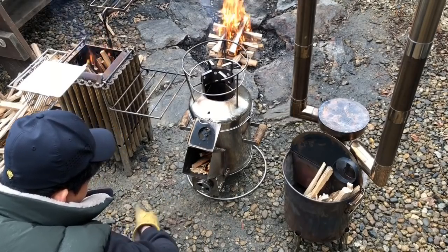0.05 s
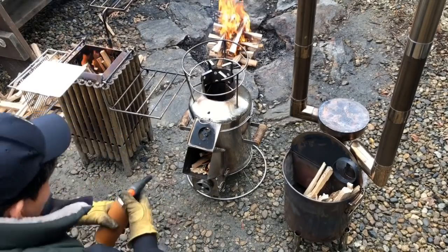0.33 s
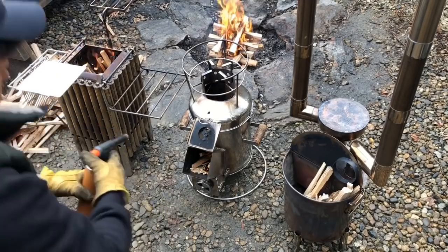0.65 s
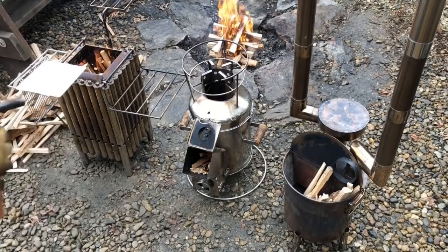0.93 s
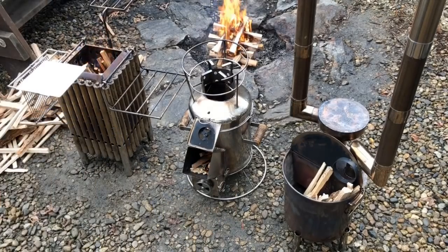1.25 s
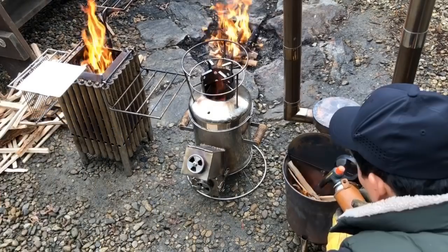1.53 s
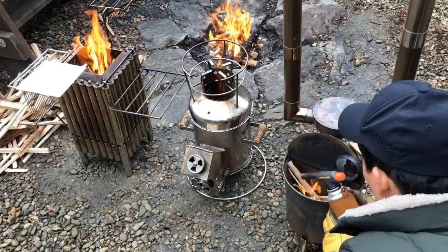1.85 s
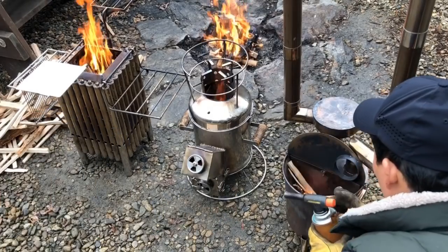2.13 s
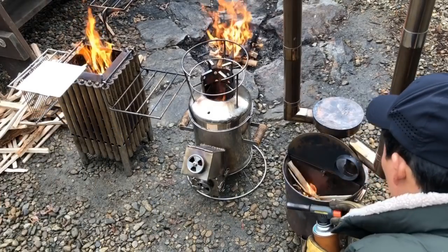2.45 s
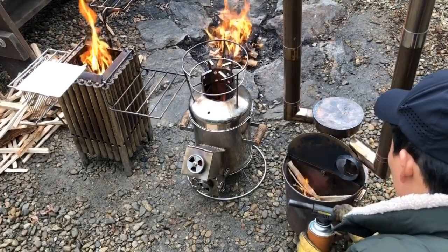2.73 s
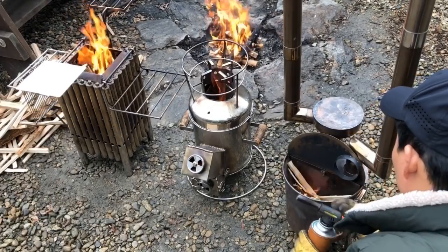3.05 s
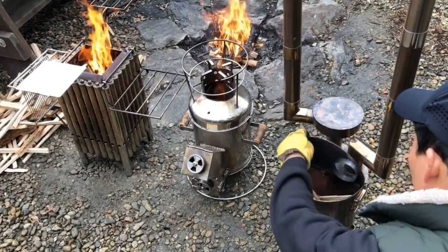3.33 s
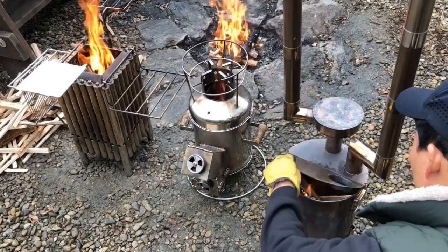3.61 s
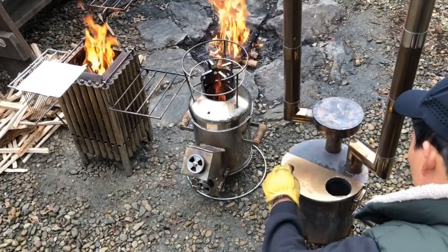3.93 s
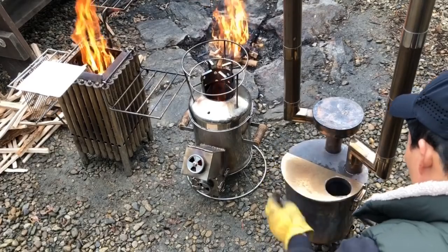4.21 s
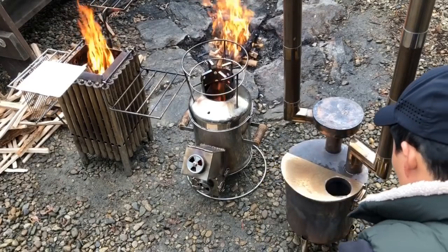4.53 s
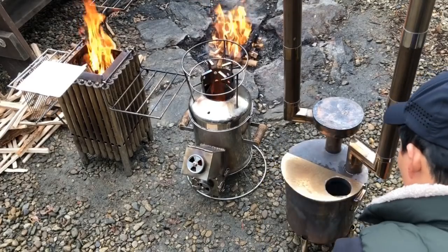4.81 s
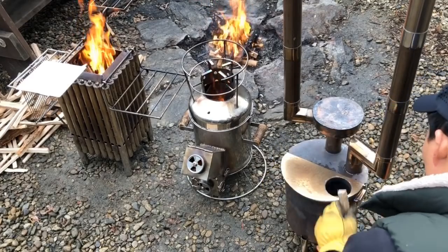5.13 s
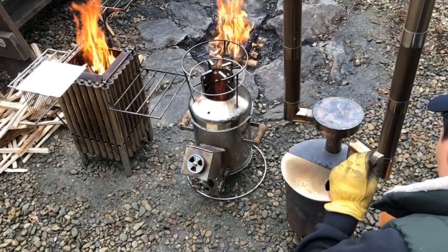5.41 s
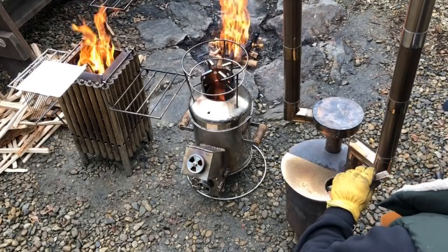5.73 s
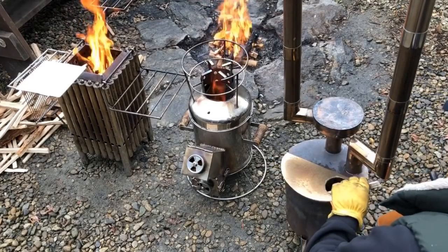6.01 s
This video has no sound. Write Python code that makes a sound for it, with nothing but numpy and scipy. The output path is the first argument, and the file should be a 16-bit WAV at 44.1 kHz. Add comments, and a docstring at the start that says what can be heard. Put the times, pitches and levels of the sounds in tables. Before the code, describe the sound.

Heard from close by in a gravel yard, burning firewood snaps and crackles over a low flutter of flames. A gas torch hisses, catches with a gentle roar and a thin whistle, then stops. After faint peeps from a far bird comes the loudest sound: a steel stove lid catches on its rim and rattles shut, ringing over the drum's thud. Boots occasionally scuff the pebbles, and a glove softly nudges the lid twice.

```python
"""Wood stoves flutter on a gravel yard; firewood pops throughout and boots shift now and then.
At 0.3 s a gas torch starts to hiss. It lights at 1.3 s with a soft, hollow roar, is drawn back from
the drum stove and shut off at 2.7 s. A far bird peeps. From 3.4 s a gloved hand nudges the hinged
steel lid; it catches on the rim, judders shut in a loud clatter and rings out over the drum's thud.
Near 5.9 s the glove nudges it twice more."""
import sys
import numpy as np
from scipy import signal
from scipy.fft import rfft, irfft, next_fast_len
from scipy.io import wavfile
from scipy.ndimage import map_coordinates

SR = 44100
rng = np.random.default_rng(int(sys.argv[2]) if len(sys.argv) > 2 else 0)


def dump_mix(stems):
    """Bounce the given channels to the path in sys.argv[1] as a 16-bit WAV at rate SR."""
    frames = np.atleast_2d(stems).T  # one column per channel
    limited = np.clip(frames, -1, 1)  # hard clip at full scale
    pcm = np.round(limited * 32767).astype(np.int16)
    wavfile.write(sys.argv[1], SR, pcm)


N = 267246

# bed of burning stoves and open air: f/Hz, level/dB
YARD_EQ = [(15, -47), (25, -7.5), (102, -4.5), (200, -8.5), (309, -5), (545, -21), (591, -16.5),
           (677, -20.5), (796, -19.5), (863, -19.5), (2350, -25), (2610, -23.5), (4300, -21.5),
           (6740, -22.5), (11300, -40.5), (16000, -29)]
# far bird: t/s, level/dB
PEEPS = [(2.725, -71), (3.27, -77), (3.454, -73.5), (4.28, -73), (4.435, -73), (4.69, -75)]
# boots grinding gravel: t/s, level/dB, half-width/s, tilt/(dB per octave)
SCUFFS = [(0.184, -65.5, 0.027, -1), (0.948, -51, 0.025, 2), (1.05, -62, 0.06, 4), (1.279, -60, .028, -2),
          (1.895, -48, 0.013, 12.5), (2.963, -57, 0.02, 2), (4.53, -67, .17, -4), (5.002, -62.5, 0.1, -1.5)]
# tone of the pebbles: f/Hz, level/dB
GRAVEL_EQ = [(150, -0.5), (500, -3.5), (1500, -4.5), (3000, -2.5), (6000, 2), (8000, -8), (11000, -14.5),
             (16000, -19)]
# soft handling bumps: t/s, level/dB, f/Hz
BUMPS = [(1.295, -55.5, 300), (2.88, -63, 150), (3.322, -57.5, 324), (4.375, -58, 326), (5.366, -59.5, 300)]
# loud pops of firewood and pebbles: t/s, level/dB, centre f/Hz, knock/dB, treble/dB
POPS = [(0.2445, -46, 1810, -7, -18), (0.3205, -41, 6230, -30, -27), (0.4683, -32, 3530, -44, -17.5),
        (0.6556, -33, 4800, -43, -38), (0.7406, -32.5, 6170, -19, -22), (0.8092, -38, 4600, -24, -25),
        (1.0032, -36.5, 4220, -39, -20), (1.017, -42, 5320, -39, -18), (1.026, -39.5, 6800, -38, -31),
        (1.0879, -40, 5850, -37, -25), (1.8825, -32, 6640, -11.5, -15), (2.0338, -38.5, 3970, -24, -38),
        (2.2144, -46.5, 5300, -23, -21), (2.805, -41.5, 1400, -6.5, -34.5), (2.8628, -45, 6860, -8, -25.5),
        (2.8699, -40.5, 1400, -11, -26.5), (2.9455, -34.5, 6350, -19, -27), (3.289, -44, 2520, -13, -30.5),
        (3.3183, -41.5, 5960, -23, -27), (3.3655, -42.5, 4020, -30, -22.5),
        (4.3511, -40.5, 6060, -10.5, -19.5), (4.3908, -39.5, 2500, -14, -28),
        (4.7631, -35, 6100, -8.5, -22), (5.1612, -35.5, 4190, -31, -24), (5.3656, -42, 5800, -20, -22),
        (5.5592, -41, 4650, -8, -28.5), (5.7872, -33, 6170, -37, -14), (5.816, -38, 6600, -30, -19)]
# low knock under a pop: f/Hz, level/dB
KNOCK_EQ = [(80, -27), (300, -1), (1000, -2), (2500, -13.5), (8000, -35)]

# torch moves: t/s, extra echo path/m, top whistle f/Hz
TORCH_MOVES = [(1.25, .56, 9250), (1.55, 0.62, 9460), (1.7, .69, 9300), (1.87, 0.76, 8730),
               (2.15, .81, 8720), (2.42, 0.81, 9150), (2.68, 0.89, 8860)]
# whistle bands: ratio to the top band, level/dB
WHISTLE_BANDS = [(.475, -5), (.595, 2), (1, 0)]
# bright hiss of the gas jet: f/Hz, level/dB
JET_EQ = [(2500, -17), (3400, -13), (3900, 3), (6300, 0.5), (7600, -4), (8800, -3), (10500, -15.5),
          (14000, -17.5), (16000, -19.5)]
# midrange spray of the gas: f/Hz, level/dB
SPRAY_EQ = [(200, -9.5), (800, -1), (2000, -2), (3500, -4), (7000, -24), (16000, -28.5)]
# flame at the drum mouth: f/Hz, level/dB
HOLLOW_FLAME_EQ = [(70, -18.5), (140, 11.5), (220, 2), (330, -4), (430, -5.5), (560, 0.5), (720, -6.5),
                   (1000, 0.5), (1180, -6), (1400, -21), (4000, -35.5)]
# flame in the open: f/Hz, level/dB
OPEN_FLAME_EQ = [(60, -27.5), (140, -2), (240, 1), (340, 6), (480, -1), (800, -4.5), (1300, -9.5),
                 (1700, -16), (3000, -33), (8000, -41)]
# flare-ups: t/s, boost/dB
FLARES = [(1.69, 7), (1.87, 5)]

# glove knocks and drags on the lid: t/s, level/dB, port ring/dB
NUDGES = [(3.4421, -70.5, -20), (3.5194, -65.5, -24), (3.595, -66, -27), (3.7055, -60, -10),
          (5.8821, -56, -9), (5.954, -62, -16)]
# drum rumble under a nudge: f/Hz, level/dB
RUMBLE_EQ = [(100, -16), (200, -1), (350, 0.5), (520, -1), (610, 0), (760, -4.5), (1050, 0), (1200, -6),
             (1380, -4), (1600, -12.5), (2500, -9.5), (5000, -33.5)]
# edge of the lid's round port: f/Hz, level/dB, t60/s
PORT_MODES = [(3530, -1.5, 0.5), (5310, -6, .2), (5720, -3, .2), (6050, -2.5, 0.22)]
# the falling lid catches the rim: t/s, level/dB, sizzle/dB, thud/dB
CATCHES = [(3.7488, -32.5, -9.5, -11), (3.7768, -32.5, -8, -33), (3.7973, -28.5, -20.5, -7.5)]
# the lid's strongest tones: f/Hz, level/dB, t60/s
LID_MODES = [(1004, -8, 0.24), (1181, -13, 0.52), (1330, -18.5, 0.64), (1342, -1.5, 0.22),
             (1464, -20.5, 0.41), (1514, -15.5, 0.503), (1697, -12, .25), (1802, -5.5, 0.3),
             (2040, -6, .25), (2657, -5.5, .24), (3233, 4, 0.1), (3570, -2.5, .22), (3890, -22, 0.76),
             (3900, -6.5, 0.12), (4376, 3, 0.24), (4550, 2, .2), (4920, -1.5, .18), (4930, -5, .18),
             (5076, -23, 0.8), (5219, -3, .18), (5420, 5.5, 0.16), (5870, -9, .2), (6230, 7.5, .17),
             (6810, 6.5, .18), (7380, 2.5, .15), (7190, 5, .15), (7610, -12.5, .15), (8085, -4.5, .15),
             (8120, 2, .15)]
# drum body: f/Hz, level/dB, t60/s
DRUM_MODES = [(149.7, -9.5, 0.4), (190, -2, .25), (221.7, -4.5, 0.36), (295, -6.5, 0.27), (357, -2.5, 0.13),
              (413, -10, .16), (534, -0.5, 0.13), (603, 9.5, 0.076), (680.68, -7.5, .22), (814, -3.5, .14),
              (880, -1, 0.17), (987, 3, .2)]
# dense wash of the steel sheet: f/Hz, level/dB
SHEET_EQ = [(300, -27), (600, -19.5), (760, -18), (1000, -12), (1380, -7.5), (1600, -14.5), (1850, -11.5),
            (2300, -10.5), (2900, -9.5), (3500, -2), (4600, -1.5), (6400, 0.5), (7600, -10), (10500, -16),
            (15700, -15)]
# decay of that wash: f/Hz, t60/s
SHEET_T60 = [(400, 0.39), (750, 0.15), (1200, 0.31), (2000, .3), (3500, 0.275), (6000, 0.26), (10000, 0.23),
             (16000, .15)]
# top-end sizzle of a hard edge hit: f/Hz, level/dB
SIZZLE_EQ = [(5000, -45.5), (8000, 12.5), (10000, 3), (12000, -7), (13300, 10.5), (14500, 0.5), (15500, 11)]
# crack at its attack: f/Hz, level/dB
CRACK_EQ = [(1000, -3), (6000, -4.5), (15000, -10.5)]

OPEN_S, LIGHT_S, WITHDRAW_S, SHUT_S = 0.29, 1.27, 1.907, 2.664  # torch cues
JET_DB, SPRAY_DB, ROAR_DB, WHISTLE_DB = -68, -71, -62.5, -75
SEAT_S, PUSH_S, SLIP_GAP_S, SLIP_COUNT = 3.8314, 0.12, 0.0211, 10  # the lid is pushed home
SETTLE_DB_PER_S, THUD_FADE_DB_PER_S = 249.5, 65
OPEN_DRUM_HZ, TOP_HZ, SOUND_M_PER_S = 240, 15950, 343


def amp(db):
    """Decibels to gain."""
    return 10 ** (np.asarray(db) / 20)


def unit(x):
    """Scale to rms 1."""
    return x / np.sqrt(np.mean(x ** 2) + 1e-20)


def along(points, hz):
    """Read a breakpoint curve on a log frequency axis."""
    f, v = np.transpose(points)
    return np.interp(np.log(hz + 1), np.log(f + 1), v)


def automation(rows):
    """One value per sample for each column after the time."""
    s, *cols = np.transpose(rows)
    return [np.interp(np.arange(N) / SR, s, c) for c in cols]


def fade_in(t, s, takes_s):
    """A smooth rise from 0 to 1 around time s."""
    return .5 + .5 * np.tanh((t - s) / (2 * takes_s))


def wobble(rate):
    """A smooth random curve, rate knots a second."""
    return map_coordinates(rng.standard_normal(int(N * rate / SR) + 4), [np.arange(N) * rate / SR])


def eq(x, gain_db):
    """Filter x by a gain in dB that depends on frequency."""
    m = next_fast_len(len(x) + 2048)
    return irfft(rfft(x, m) * amp(gain_db(np.fft.rfftfreq(m, 1 / SR))), m)[:len(x)]


def noise(spectrum, size):
    """Noise of rms 1 with the given spectrum."""
    return unit(eq(rng.standard_normal(size), lambda hz: along(spectrum, hz)))


def add(track, s, sound):
    """Mix a sound into the track from time s."""
    part = track[round(s * SR):][:len(sound)]
    part += sound[:len(part)]


def grit(size, rate, spread_db):
    """Random tiny impacts of uneven strength, rate a second."""
    ticks = (rng.random(size) < rate / SR) * np.sign(rng.standard_normal(size))
    return ticks * amp(spread_db * np.clip(rng.standard_normal(size), -2, 2))


def clinks(impacts):
    """Give every tiny impact a very short noise tail."""
    t = np.arange(256) / SR
    power = signal.fftconvolve(impacts ** 2, amp(-60 * t / 0.0087) ** 2)[:len(impacts)]
    return np.sqrt(np.abs(power)) * rng.standard_normal(len(impacts))


def fires():
    """The bed: stoves flutter softly under a sprinkle of tiny crackles."""
    crackle = eq(clinks(grit(N, rate=15, spread_db=10)), lambda hz: along(GRAVEL_EQ, hz))
    return amp(-68 + 0.64 * wobble(9)) * noise(YARD_EQ, N) + amp(-81.5) * unit(crackle)


def bird():
    """Short, pure peeps from far off."""
    t = np.arange(N) / SR
    swell = sum(amp(db) * np.exp(-((t - s) / 0.015) ** 2) for s, db in PEEPS)
    pitch_hz = 2700 + 20 * wobble(20)
    return np.sqrt(2) * swell * np.sin(2 * np.pi * np.cumsum(pitch_hz) / SR)


def gravel():
    """Pebbles grind in short swells under a boot, and a little grit scatters after each loud pop."""
    out, t = np.zeros(N), np.arange(N) / SR
    debris = [(s + .015, db - 30, .012, 3.5) for s, db, *_ in POPS]  # columns as in SCUFFS
    for s, db, width_s, tilt_db in SCUFFS + debris:
        near = np.abs(t - s) < 3 * width_s
        grains = clinks(grit(near.sum(), rate=1300, spread_db=4.5))
        stones = eq(grains, lambda hz: along(GRAVEL_EQ, hz) + tilt_db * np.log2(hz / 4000 + 0.25))
        out[near] += amp(db) * unit(stones) * np.exp(-((t[near] - s) / width_s) ** 2)
    return out


def bumps():
    """A soft contact gives one low, quickly damped note."""
    out, t = np.zeros(N), np.arange(8192) / SR
    envelope = amp(4.5 - 60 * t / 0.072) * (1 - np.exp(-t / 0.0014))
    for s, db, hz in BUMPS:
        add(out, s, amp(db) * envelope * np.sin(2 * np.pi * hz * t))
    return out


def faint_pops():
    """Cues for weak pops at random moments, columns as in POPS."""
    return [(when * N / SR, -50.5 + 3 * size, 3000 + 3500 * pitch, -16, -23)
            for when, size, pitch in rng.random((8, 3))]


def pops():
    """Firewood snaps, with a short rattle and knock and a faint scatter off the stoves around."""
    out, t = np.zeros(N), np.arange(8192) / SR
    attack = 1 / (1 + np.exp(-(t - .001) / .00012))
    for s, db, centre_hz, knock_db, treble_db in POPS + faint_pops():
        peak = [(centre_hz * 0.77, -4), (centre_hz, 1), (centre_hz * 1.25, -4)]
        top = [(max(8000, centre_hz * 0.83), -7), (max(10500, centre_hz * 1.4), treble_db + 4)]
        tone = [(200, -12), (1200, -8), *peak, *top, (16000, treble_db + 12)]
        snap = noise(tone, len(t)) * np.exp(-((t - .0015) / .0006) ** 2)
        t60 = 0.035 * 2 ** (knock_db / 31)  # heavier pieces knock more and rattle longer
        rattle = noise(tone, len(t)) * (amp(-10.5 - 60 * t / t60) + amp(-28.5 - 60 * t / 0.18))
        knock = noise(KNOCK_EQ, len(t)) * amp(knock_db - 11 - 60 * t / 0.11)
        add(out, s, amp(db) * (amp(-4.5) * snap / np.abs(snap).max() + rattle + knock) * attack)
    return out


def valve():
    """Envelopes of gas flow and flame, each 0-1."""
    t = np.arange(N) / SR
    flow = fade_in(t, OPEN_S, 0.039) * (1 - fade_in(t, SHUT_S, 0.032))
    return flow, flow * fade_in(t, LIGHT_S, 0.007)


def whistle():
    """Narrow bands of hiss drift together as the lit torch turns in the stove."""
    _, top_hz = automation(TORCH_MOVES)
    _, lit = valve()
    phase = 2 * np.pi * np.cumsum(top_hz) / SR
    bands = np.zeros(N)
    for ratio, db in WHISTLE_BANDS:
        rate = 700 * ratio  # sets the bandwidth
        bands += amp(db) * (wobble(rate) * np.sin(ratio * phase) + wobble(rate) * np.cos(ratio * phase))
    return amp(WHISTLE_DB) * lit * unit(bands)


def comb(x, spacing_hz, strength):
    """Two bounces between drum and ground carve a comb of moving resonances."""
    n = np.arange(N)
    return unit(sum(strength ** k * np.interp(n - k * SR / spacing_hz, n, x) for k in range(3)))


def torch():
    """The gas jet hisses; the flame roars, hollow at first, and its echo lengthens as the torch moves."""
    t = np.arange(N) / SR
    flow, lit = valve()
    age_s = np.maximum(t - LIGHT_S, 0)
    path_m, _ = automation(TORCH_MOVES)
    comb_hz = SOUND_M_PER_S / path_m

    hollow = 1 - fade_in(t, WITHDRAW_S, 0.047)
    flame = np.sqrt(hollow) * noise(HOLLOW_FLAME_EQ, N) + np.sqrt(1 - hollow) * noise(OPEN_FLAME_EQ, N)
    flare_db = sum(db * np.exp(-((t - s) / 0.042) ** 2) for s, db in FLARES)
    growth_db = -2.5 * np.exp(-age_s / 0.25)  # the young flame starts weaker
    roar = amp(ROAR_DB + growth_db + flare_db + 0.92 * wobble(25.04))
    roar *= comb(flame, comb_hz, strength=0.19 + 0.22 * hollow)

    jet = amp(JET_DB - 0.3 * lit + 1.1 * wobble(7.2))
    jet *= comb(noise(JET_EQ, N), comb_hz * (1 + .008 * wobble(5)), strength=0.24)
    duck_db = 22 * lit * np.exp(-(age_s / 0.21) ** 2)  # the spray ducks as the flame catches
    recede_db = 8 * (path_m - path_m[0])  # and fades as the torch is drawn away
    spray = amp(SPRAY_DB - recede_db - duck_db) * noise(SPRAY_EQ, N)
    return lit * roar + flow * (jet + spray)


def ring(modes, t, scatter_db, detune=.002):
    """Damped modes; each hit strikes them at new strengths and phases, slightly detuned."""
    hz, db, t60 = np.transpose(modes)[:, :, None]
    gain = amp(db + scatter_db * rng.standard_normal(hz.shape))
    hz = hz * (1 + detune * rng.standard_normal(hz.shape))
    waves = np.sin(2 * np.pi * (hz * t + rng.random(hz.shape))) * amp(-60 * t / t60)
    return (gain * waves).sum(0) * np.sqrt(2 / np.sum(gain ** 2))


def sheet_modes(count=520):
    """The thin steel's uneven modes, shared by every hit: f/Hz, level/dB."""
    slots = np.linspace(np.sqrt(300), np.sqrt(TOP_HZ), count) ** 2
    return slots + np.gradient(slots) * rng.random(count), 2.5 * rng.standard_normal(count)


def sheet(modes, spectrum, t):
    """A metallic wash of close modes at new phases, each band dying at its own rate."""
    modes_hz, modes_db = modes
    phases = np.exp(2j * np.pi * rng.random(len(modes_hz)))
    lines = np.zeros(len(t) // 2 + 1, complex)
    lines[(modes_hz * len(t) / SR).astype(int)] = amp(modes_db) * phases
    hz = np.fft.rfftfreq(len(t), 1 / SR)
    sustained = unit(irfft(lines * amp(along(spectrum, hz)), len(t)))
    band_hz, frame_s, bands = signal.stft(sustained, SR, nperseg=256)
    decay = amp(-60 * frame_s / along(SHEET_T60, band_hz)[:, None])
    return signal.istft(bands * decay, SR, nperseg=256)[1][:len(t)]


def nudges(modes):
    """A glove knocks the lid, softening and damping its ring while the drum rumbles below."""
    out, t = np.zeros(N), np.arange(32768) / SR
    glove = amp(-60 * t / .9) * (1 - np.exp(-t / 0.00092))
    for s, db, port_db in NUDGES:
        steel = amp(-1.5) * sheet(modes, SHEET_EQ, t) + amp(-13) * ring(LID_MODES, t, scatter_db=2)
        port = amp(port_db) * ring(PORT_MODES, t, scatter_db=1)
        rumble = amp(1 - 60 * t / 0.53) * noise(RUMBLE_EQ, len(t))
        add(out, s, amp(db) * (steel + port + rumble) * glove)
    return out


def slips():
    """The lid sticks and slips down the rim, weakening once the push ends; columns as in CATCHES."""
    since_s = SLIP_GAP_S * np.arange(SLIP_COUNT)
    late, louder = rng.standard_normal((SLIP_COUNT, 2)).T
    times = SEAT_S + since_s + .0015 * late * (since_s > 0)
    levels = -24.5 + 0.46 * louder - SETTLE_DB_PER_S * np.maximum(since_s - PUSH_S, 0)
    thuds = -12.5 - THUD_FADE_DB_PER_S * since_s
    return [(s, db, -9, thud_db) for s, db, thud_db in zip(times, levels, thuds)]


def lid_clatter(modes):
    """Each hit of lid on rim rings the sheet and the drum; hard edges add crack, sizzle and skid."""
    out, t = np.zeros(N), np.arange(32768) / SR
    attack = 1 - np.exp(-t / 0.0013)
    for s, db, sizzle_db, thud_db in CATCHES + slips():
        steel = amp(-1.5) * sheet(modes, SHEET_EQ, t) + amp(-3) * ring(LID_MODES, t, scatter_db=-0.5)
        tilt_db = 0.14 * (db + 27.5)  # harder hits are brighter
        steel = eq(steel, lambda hz: tilt_db * np.log2(hz / 4000 + 0.145))
        sizzle = amp(sizzle_db - 60 * t / 1.2) * sheet(modes, SIZZLE_EQ, t)
        crack = amp(sizzle_db + 10 - 60 * t / 0.0057) * noise(CRACK_EQ, len(t))
        scrape = eq(grit(len(t), rate=1500, spread_db=-5), lambda hz: along(SHEET_EQ, hz))
        skid = amp(-6 - 60 * t / .08) * unit(scrape)
        thud = amp(thud_db) * ring(DRUM_MODES, t, scatter_db=4) * (1 - np.exp(-t / 0.00097))
        if s < SEAT_S:  # the drum lacks low end until the lid covers it
            thud = eq(thud, lambda hz: -10 * np.log10(1 + (OPEN_DRUM_HZ / (hz + 1)) ** 6))
        add(out, s, amp(db) * (steel + sizzle + crack + skid + thud) * attack)
    return out


def scene():
    """The mono mix, heard from a step away in the open."""
    modes = sheet_modes()
    lid = lid_clatter(modes) + nudges(modes)
    return (lid + bumps() + pops() + gravel() + torch() + whistle() + fires() + bird())[None]


def record(dry):
    """A low cut at 40 Hz and a brick wall above TOP_HZ."""
    band_db = lambda hz: -10 * np.log10(1 + (40 / (hz + 1)) ** 8) - 120 * (hz > TOP_HZ)
    return np.array([eq(ch, band_db) for ch in dry])


dry = scene()
out = record(dry)
dump_mix(out)
```